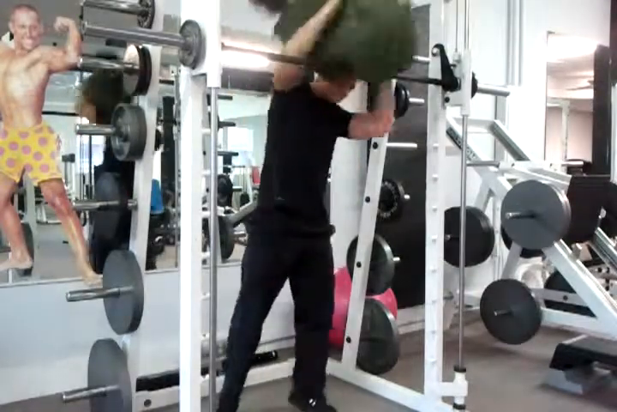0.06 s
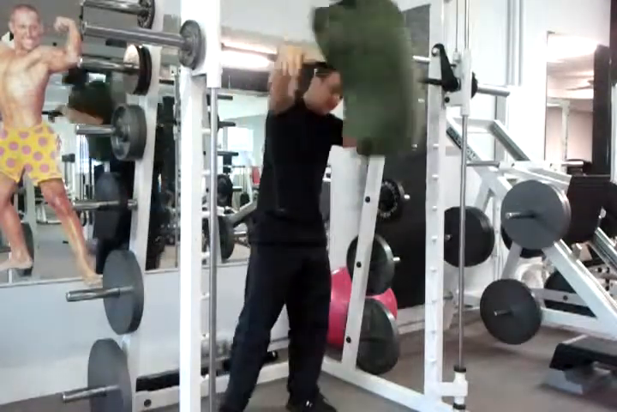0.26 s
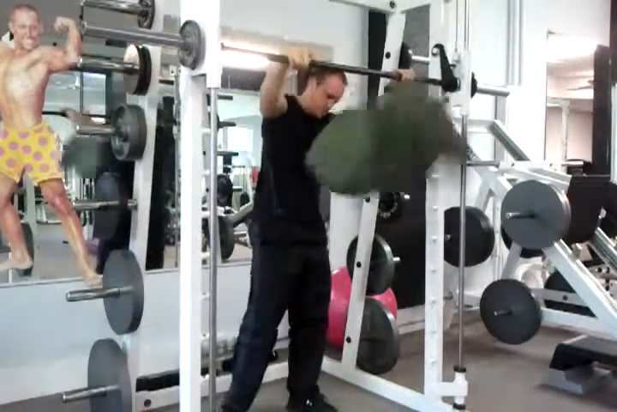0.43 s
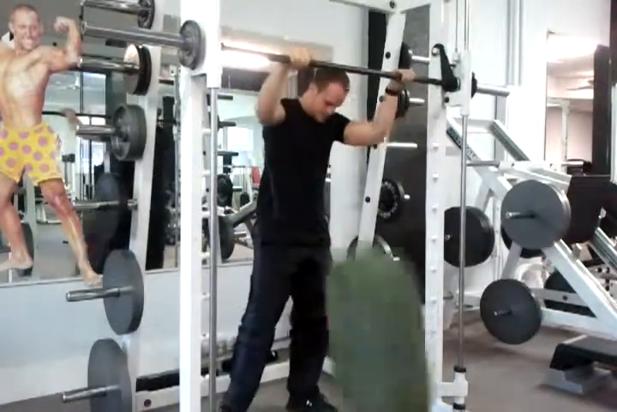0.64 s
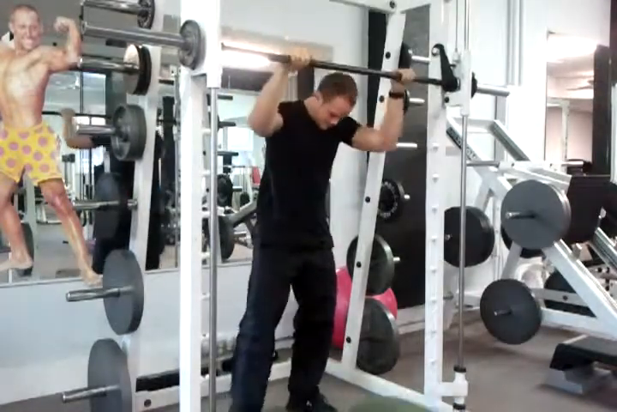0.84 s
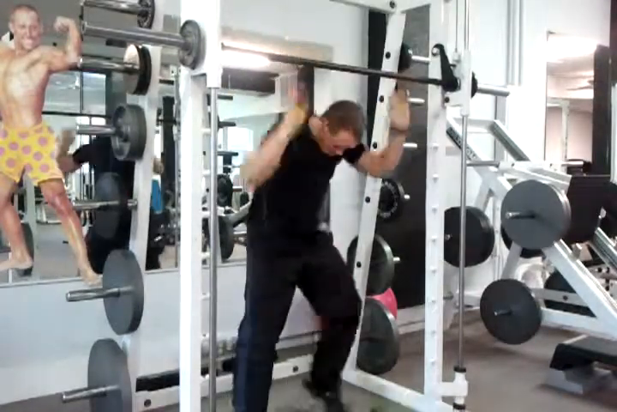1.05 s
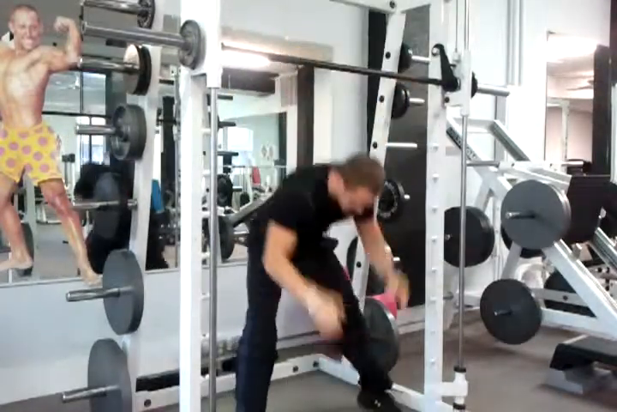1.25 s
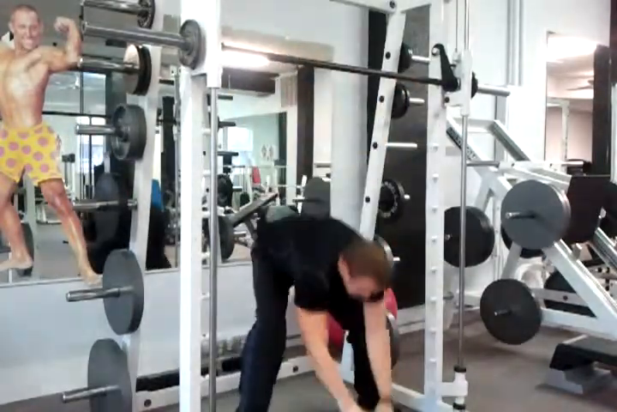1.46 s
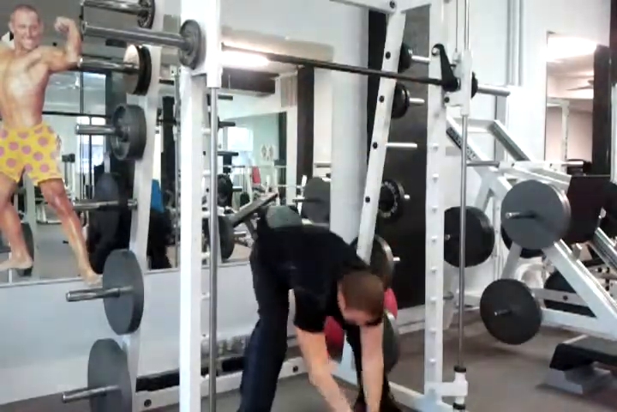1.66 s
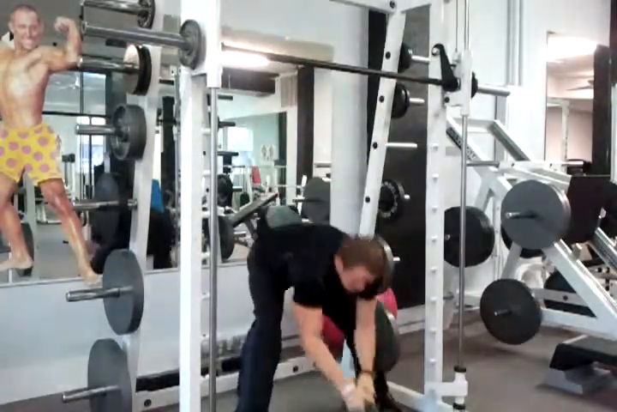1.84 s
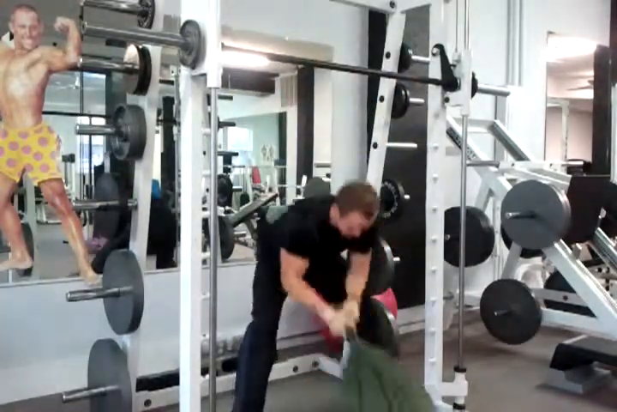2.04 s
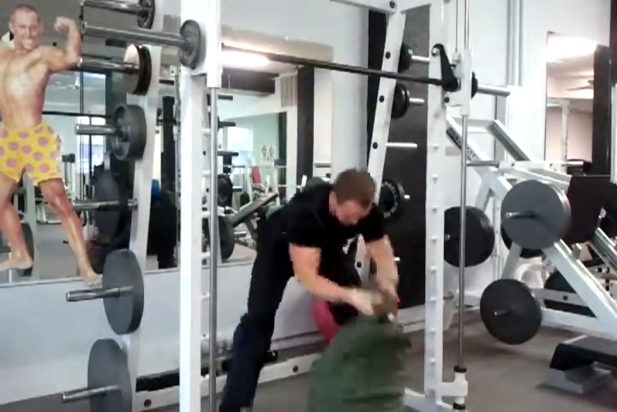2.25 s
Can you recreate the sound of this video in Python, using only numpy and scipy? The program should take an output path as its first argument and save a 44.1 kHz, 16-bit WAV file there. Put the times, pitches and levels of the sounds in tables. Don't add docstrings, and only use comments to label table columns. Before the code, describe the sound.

A heavy sandbag rubs over a steel bar, which clanks and rings briefly, then slams on the rubber floor with a distorted boom; softer thuds and canvas rustle follow in a hard, reverberant gym, small mono microphone.

```python
import sys
import numpy as np
from scipy import signal
from scipy.fft import rfft, irfft
from scipy.io import wavfile
from scipy.ndimage import uniform_filter1d

SR = 44100
rng = np.random.default_rng(int(sys.argv[2]) if len(sys.argv) > 2 else 0)


def undo_db(level):
    steps = np.asarray(level, float) / 20
    return 10 ** steps


def transcribe(u):
    v = np.clip(np.atleast_2d(u).T, -1, 1)
    q = np.round(v * 32767).astype(np.int16)
    wavfile.write(sys.argv[1], SR, q)


N = 101430
TIME_S = np.arange(N) / SR


def coloured(x, spectrum):
    pitch_hz, level_db = np.transpose(spectrum)
    bin_hz = np.arange(N // 2 + 1) * SR / N
    gain = undo_db(np.interp(np.log(bin_hz + 1), np.log(pitch_hz), level_db))
    y = irfft(rfft(x) * gain, N)
    return y / y.std()


def grains(per_s, spread_db):
    sizes = undo_db(spread_db * np.minimum(rng.exponential(1, N), 4)) * rng.standard_normal(N)
    present = rng.random(N) < per_s / SR
    return sizes * present + 0.25 * rng.standard_normal(N)


def push(start_s, rise_s, hold_s, fall_s):
    since = TIME_S - start_s
    rise = np.clip(since / max(rise_s, 1e-4), 0, 1) ** 2
    return rise * np.exp(-np.maximum(since - rise_s - max(hold_s, 0), 0) / fall_s)


def ring(clicks, pitch_hz, t60_s):
    r = undo_db(-60 / (t60_s * SR))
    w = 2 * np.pi * pitch_hz / SR
    return signal.lfilter([0, np.sin(w)], [1, -2 * r * np.cos(w), r * r], clicks + 1e-18)


# pitch_hz, level_db
HUM_SPECTRUM = [(15, -65), (25, -5), (313, -10), (466, -11.5), (533, -7), (680, -11), (830, -7),
                (1350, -16.5), (5000, -25.5), (6500, -40), (11000, -120)]


def hum():
    return undo_db(-41) * coloured(rng.standard_normal(N), HUM_SPECTRUM)


# pitch_hz, t60_s
HALL_T60 = [(100, 0.56), (300, 0.78), (1000, 0.7), (3000, 0.67), (7000, 0.48)]


def hall(x):
    level_db, onset_s = -2.5, 0.0031
    paths, swap_s = 5, .006
    t = np.arange(SR) / SR
    edges_hz = 42 * 2 ** np.arange(0, 8.1, .5)
    pitch_hz, t60_s = np.transpose(HALL_T60)
    white = rng.standard_normal((2, paths, SR))
    tails = 0
    for k, (low, high) in enumerate(zip(edges_hz, edges_hz[1:])):
        sos = signal.butter(2, [low, high], "band", fs=SR, output="sos")
        band = signal.sosfilt(sos, white[k % 2])
        life_s = np.interp(np.log(low * high) / 2, np.log(pitch_hz), t60_s)
        tails = tails + band * undo_db(-60 * t / life_s) / np.sqrt(life_s)
    tails = tails * (1 - np.exp(-t / onset_s))
    turn = TIME_S / swap_s - np.arange(paths)[:, None]
    share = np.cos(np.pi / 2 * np.clip(np.abs((turn + 1) % paths - 1), 0, 1))
    wet = signal.fftconvolve(x * share, tails, axes=1)[:, :N].sum(axis=0)
    return undo_db(level_db) * wet / np.sqrt(.5 * np.sum(tails[0] ** 2))


# start_s, level_db
RUB_EFFORT = [(0, -34), (.12, -34), (.2, -37), (.5, -42.5), (1.05, -46), (1.15, -21), (1.2, -76.5),
              (1.38, -37.5), (1.46, -32), (1.6, -40.5), (1.72, -39.5), (1.77, -40.5), (1.86, -47),
              (2.0, -41), (2.14, -25.5), (2.22, -25.5), (2.3, -31)]
# pitch_hz, level_db
CANVAS_SPECTRUM = [(200, -41), (450, -18), (1000, -15), (1500, -12.5), (3000, -10), (5000, -10.5),
                   (7700, -2), (10000, -16.5)]


def rustle():
    start_s, level_db = np.transpose(RUB_EFFORT)
    effort = undo_db(np.interp(TIME_S, start_s, level_db))
    return effort * coloured(grains(per_s=4500, spread_db=3.5), CANVAS_SPECTRUM)


STEEL_HZ = [1846.5, 1886.5, 1987, 2062, 2355, 2702, 3138, 3805, 4635, 4915, 5378, 6128, 6170, 6349]
# level_db, t60_s
STEEL_MODES = [(-4.5, 0.98), (-0.5, 1.1), (-3, 0.52), (-2, 0.42), (-6, 0.74), (-6.5, 0.76), (-10, .7),
               (-12.5, 0.71), (-17, 0.43), (-2, 0.19), (-6, 0.59), (-10, 0.31), (-13, 0.44), (-15.5, .6)]


def bar():
    strike_s, strike_db, swell_s = .2138, -11, .025
    grip_s, grip_fall_s = 0.43, 0.0093
    click = np.zeros(N)
    click[int(strike_s * SR)] = undo_db(strike_db)
    out = np.zeros(N)
    for k, (pitch_hz, (level_db, t60_s)) in enumerate(zip(STEEL_HZ, STEEL_MODES)):
        sign = (-1) ** (k // 2)
        out += sign * undo_db(level_db) * ring(click, pitch_hz, t60_s)
    return out * np.sqrt(push(strike_s, swell_s, grip_s - strike_s - swell_s, grip_fall_s))


# start_s, level_db
KNOCKS = [
    (.2115, 2),
    (.2138, 5.5),
    (.221, -2),
    (.232, -18),
    (.251, -5.5),
    (.285, -20.5),
]
# pitch_hz, level_db
CRASH_SPECTRUM = [(120, -33), (200, -24.5), (533, -20), (924, -19), (1180, -21), (1870, -11), (2500, -13.5),
                  (6260, -10), (7760, -9.5), (10100, -21.5), (17100, -120)]


def crash():
    jolts = sum(undo_db(level_db - 2.5) * push(start_s, 0.00035, 0, .012) for start_s, level_db in KNOCKS)
    return jolts * coloured(rng.standard_normal(N), CRASH_SPECTRUM)


# start_s, level_db, rise_s, hold_s, slap_share_db
THUDS = [(0, -27.5, 0.18, .03, -5), (0.298, -18.5, .015, 0.018, -1.5), (0.426, -25, .01, 0.015, -6),
         (0.472, -28, .02, 0.064, -27), (0.599, -31.5, .01, 0.023, -8.5), (0.679, -32, .02, 0.041, -39),
         (0.7955, -15.5, 0.00092, 0.011, -3), (0.8297, -11, 0.0035, 0.024, 2),
         (0.861, -8, .02, 0.041, -11.5), (1.026, -19.5, .01, 0.048, -10.5),
         (1.088, -21.5, 0.043, .02, -8.5), (1.189, -35, .01, 0.03, -17), (1.464, -46.5, 0.012, 0.049, -28),
         (1.706, -43, .02, 0.049, -30), (1.893, -30.5, 0.092, .01, -8.5), (2.004, -31, .01, 0.018, -7.5),
         (2.066, -32, 0.0025, 0.011, 2.5), (2.131, -36.5, .02, .04, -9), (2.193, -34.5, .004, .02, -28),
         (2.28, -36, .01, .02, 6)]
# pitch_hz, level_db
BODY_SPECTRUM = [(60, -60.5), (120, -33), (190, -17.5), (280, -3.5), (650, -1), (1400, -10.5), (2500, -18),
                 (5000, -33)]
# pitch_hz, level_db
SLAP_SPECTRUM = [(290, -1), (500, -13), (682, -3), (1050, 1.5), (1790, -3.5), (4630, -6.5), (7760, -6.5),
                 (10100, -33.5), (17100, -120)]


def thuds():
    fall_s, bursts_per_s, burst_db = 0.028, 98, 3
    weight, slap = np.zeros(N), np.zeros(N)
    for start_s, level_db, rise_s, hold_s, share_db in THUDS:
        force = undo_db(level_db) * push(start_s, rise_s, hold_s, fall_s)
        weight += force
        slap += undo_db(share_db) * force
    sand = grains(per_s=1500, spread_db=3)
    bursts = uniform_filter1d(rng.standard_normal(N), size=int(SR / bursts_per_s / 2))
    bursts = undo_db(burst_db * bursts / bursts.std())
    return weight * coloured(sand, BODY_SPECTRUM) + slap * bursts * coloured(sand, SLAP_SPECTRUM)


# pitch_hz, level_db
BOOM_SPECTRUM = [(40, -47), (70, -24), (110, -4), (160, 2), (230, 0.5), (330, -1.5), (500, -24), (900, -50)]


def boom():
    load = push(start_s=.828, rise_s=0.0024, hold_s=0.02, fall_s=.03)
    return undo_db(-10) * load * coloured(rng.standard_normal(N), BOOM_SPECTRUM)


# start_s, level_db, contact_s
BLOWS = [
    (0.2147, -31.5, 0.00087),
    (0.496, -24, 0.00099),
    (.8274, 2, 0.00011),
    (0.8385, -1, 0.00023),
    (.853, 1, 0.000057),
    (0.867, -8, 0.00057),
    (.879, -18, .0002),
    (0.9, -3.5, 0.0006),
]
# pitch_hz, level_db, t60_s
SLAB_MODES = [(104, 4.5, 0.12), (162, -2, 0.24), (226, -13, 0.096), (299, 0, 0.18), (380.4, -12, 0.16),
              (517, -23, 0.063), (677, -15, 0.087)]


def slab():
    snap_db, modes_db = 7, -16
    snaps, clicks = np.zeros(N), np.zeros(N)
    for k, (start_s, level_db, contact_s) in enumerate(BLOWS):
        sign = (-1) ** k
        snaps += sign * undo_db(level_db) * np.exp(-((TIME_S - start_s) / contact_s) ** 2)
        clicks[int(start_s * SR)] = undo_db(level_db + modes_db)
    modes = sum(undo_db(level_db) * ring(clicks, pitch_hz, t60_s) for pitch_hz, level_db, t60_s in SLAB_MODES)
    return undo_db(snap_db) * snaps + modes


def scene():
    near = rustle() + thuds() + boom() + crash() + slab()
    steel = bar()
    steel_send_db = -12
    wet = hall(near + undo_db(steel_send_db) * steel)
    mono = .5 * (near + wet) + steel + hum()
    return np.stack([mono, mono])


def roll_off(x):
    return signal.sosfilt(signal.butter(12, 15800, fs=SR, output="sos"), x)


def record(dry):
    drive_db, low_hz, top_hz = 1.02, 115.6, 7900
    mic_ceiling, ceiling = 0.98, .96
    fizz_db, smear_s, fizz_from = -18, .03, .012
    low_cut = signal.butter(3, low_hz, "high", fs=SR, output="sos")
    thin = signal.sosfilt(low_cut, undo_db(drive_db) * dry)
    thin = np.clip(thin, -mic_ceiling, mic_ceiling)
    narrow = signal.sosfilt(signal.ellip(12, .3, 90, top_hz, fs=SR, output="sos"), thin)
    flat = np.clip(narrow, -ceiling, ceiling)
    excess = np.sqrt(np.abs(uniform_filter1d((narrow - flat) ** 2, size=int(smear_s * SR))))
    fizz_level = uniform_filter1d(np.maximum(excess - fizz_from, 0), size=300)
    fizz_band = signal.ellip(8, .3, 70, top_hz, "high", fs=SR, output="sos")
    fizz = signal.sosfilt(fizz_band, rng.standard_normal(N))
    flat = flat + undo_db(fizz_db) * fizz_level * fizz
    final = signal.sosfilt(signal.ellip(8, .2, 35, 15800, fs=SR, output="sos"), flat)
    return roll_off(final)


dry = scene()
out = record(dry)
transcribe(out)
```